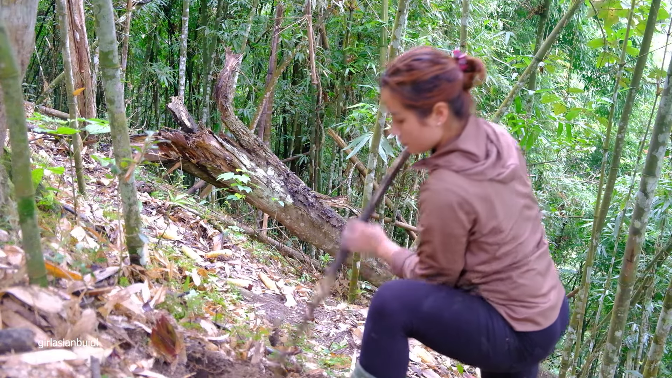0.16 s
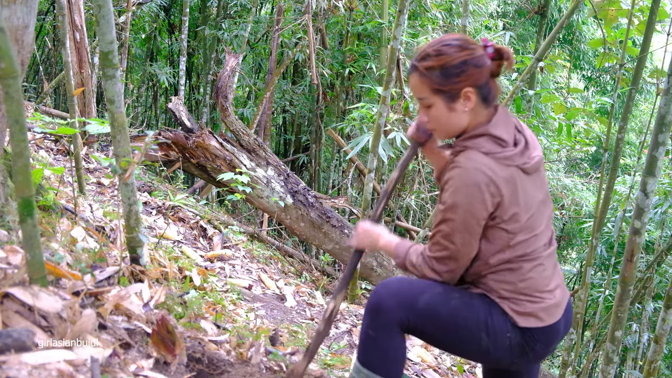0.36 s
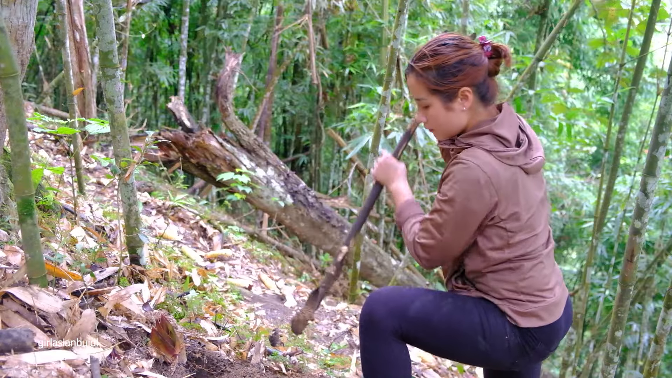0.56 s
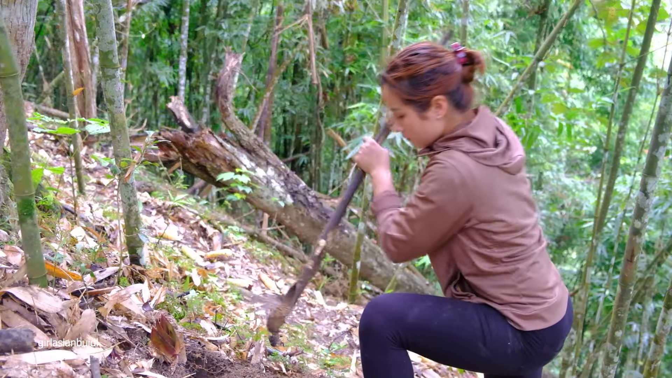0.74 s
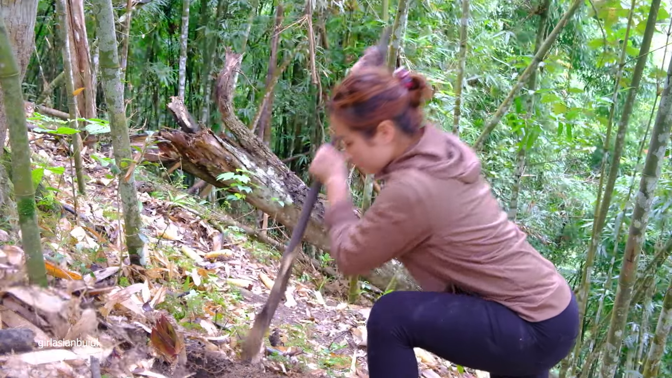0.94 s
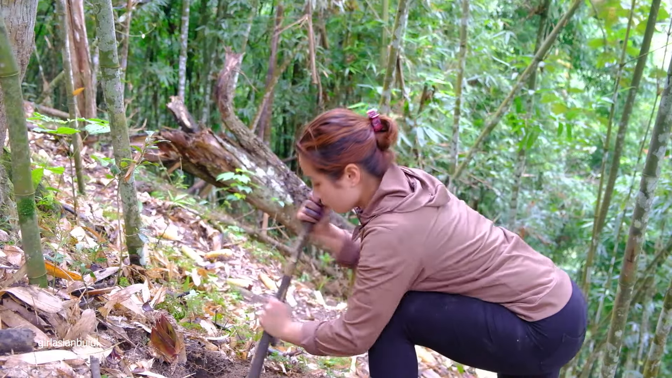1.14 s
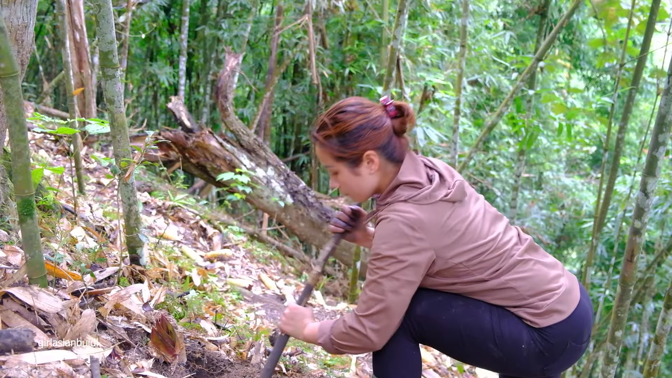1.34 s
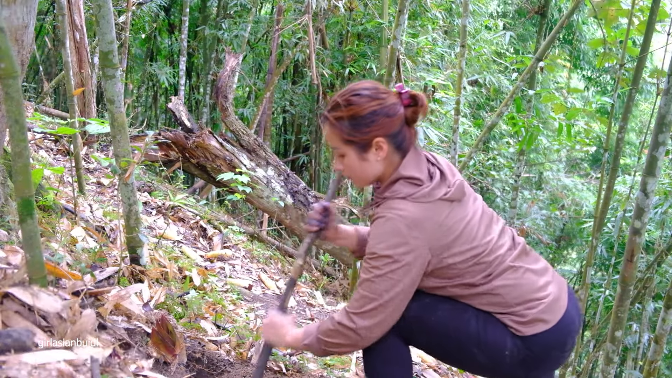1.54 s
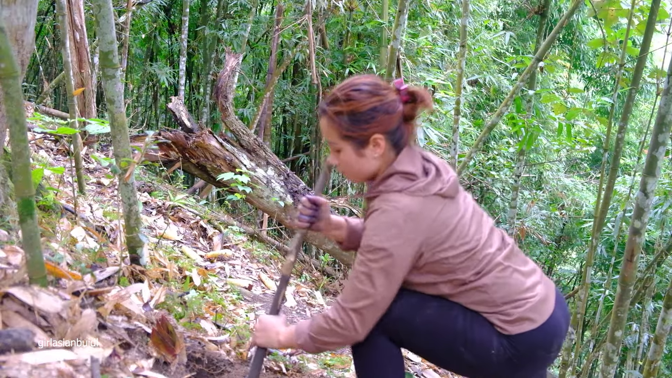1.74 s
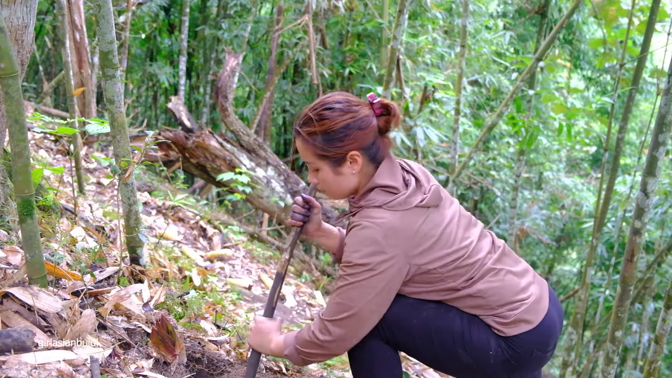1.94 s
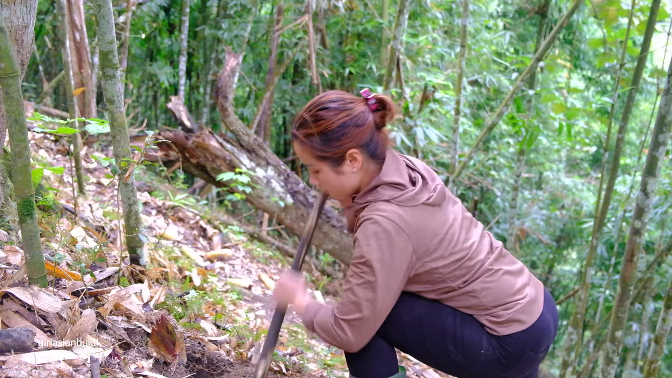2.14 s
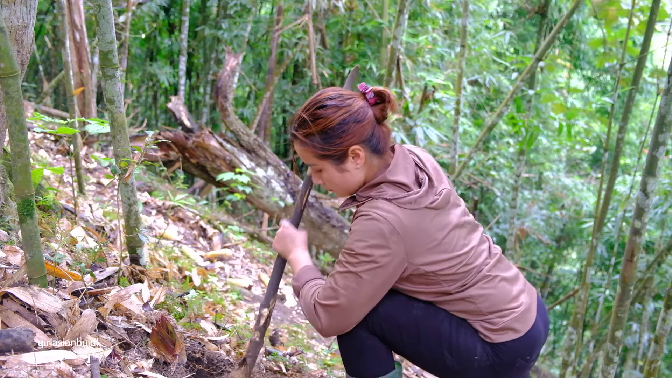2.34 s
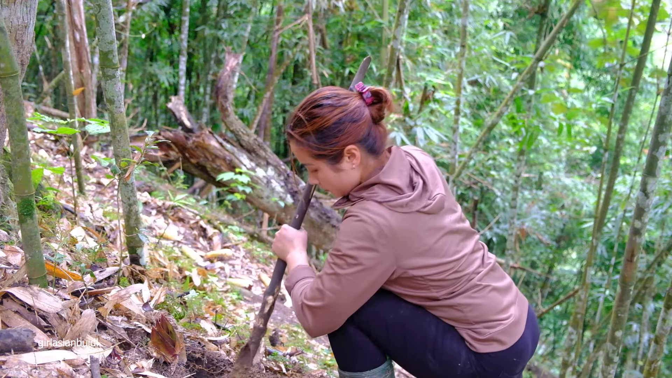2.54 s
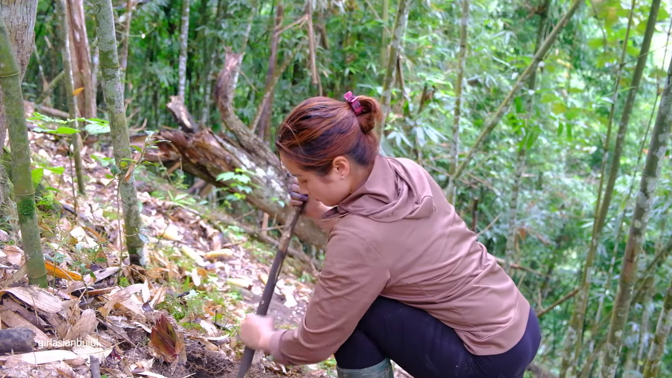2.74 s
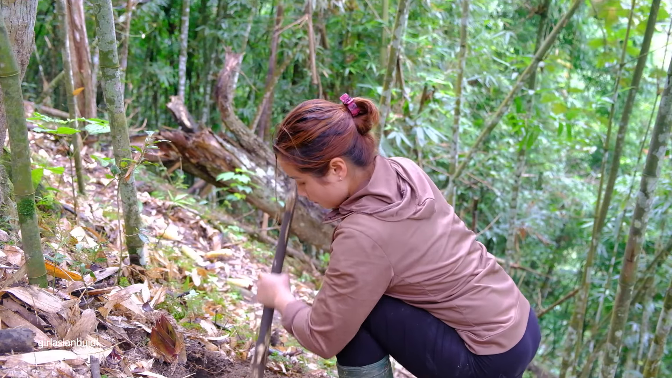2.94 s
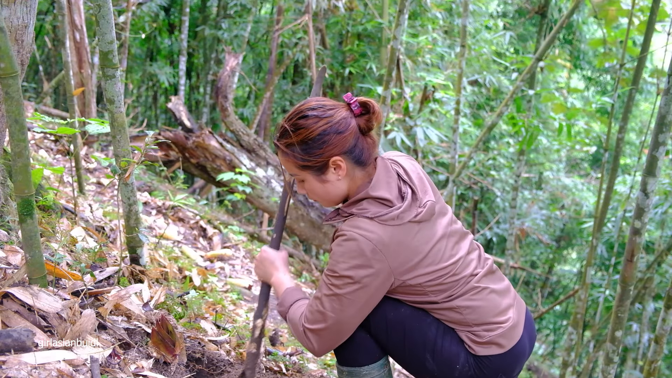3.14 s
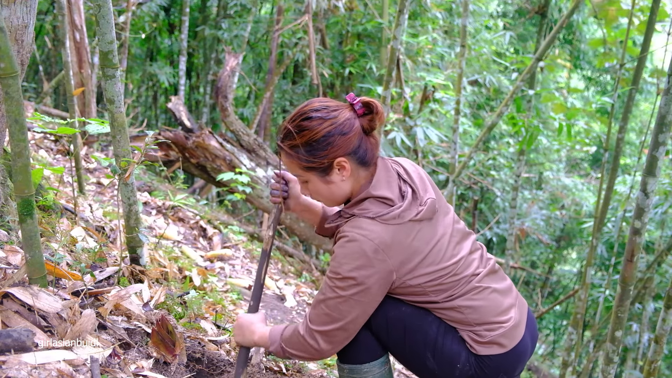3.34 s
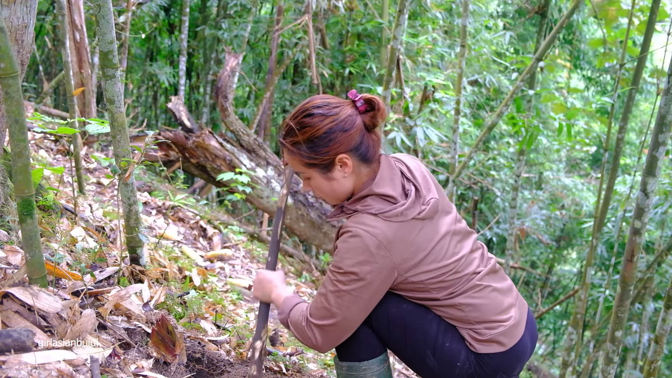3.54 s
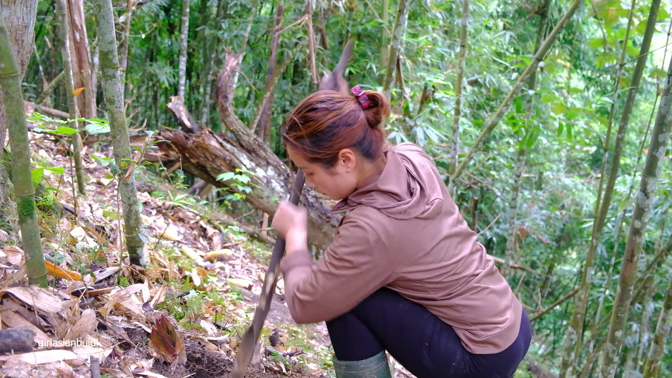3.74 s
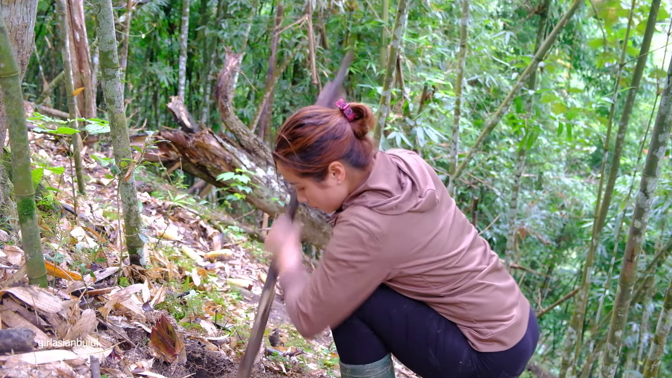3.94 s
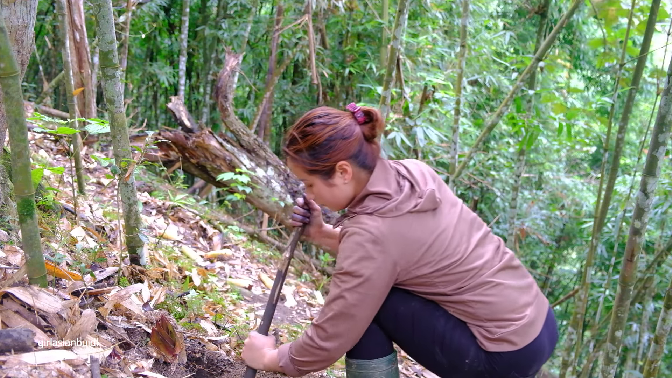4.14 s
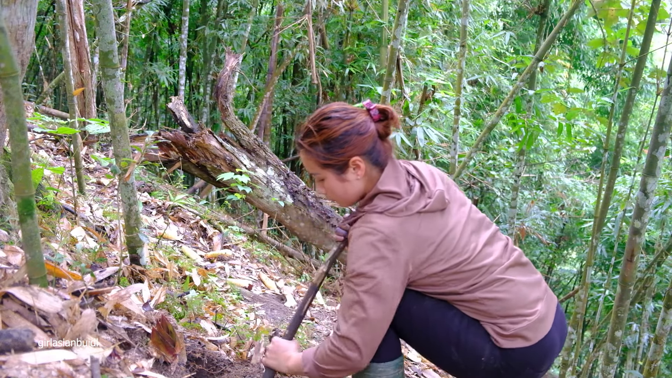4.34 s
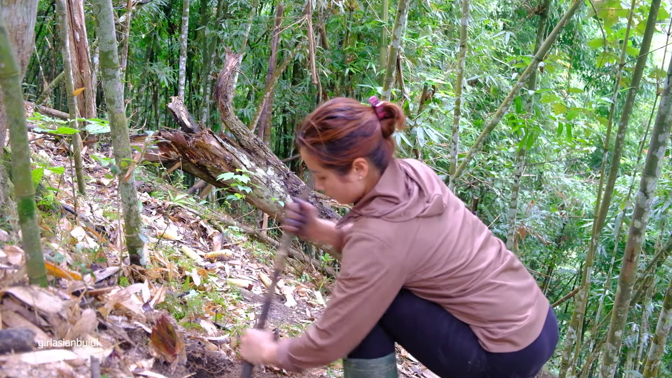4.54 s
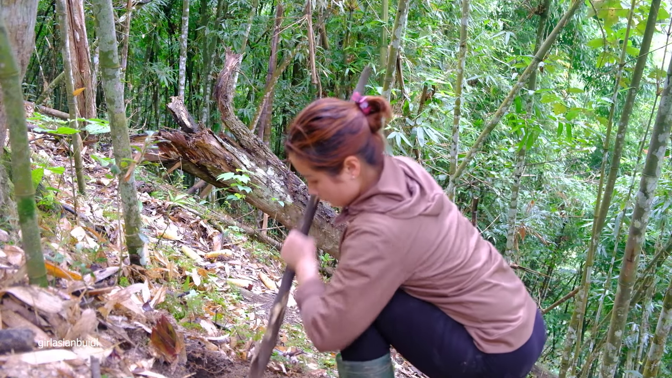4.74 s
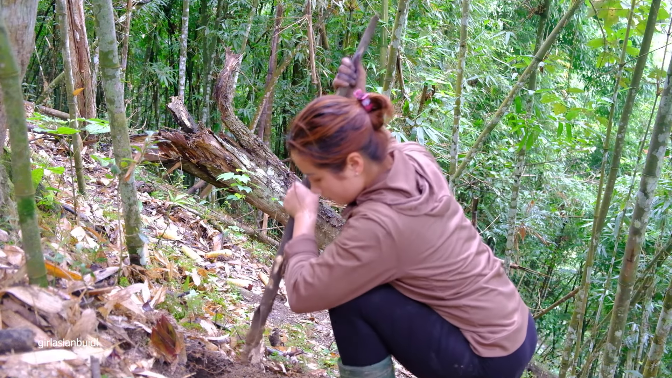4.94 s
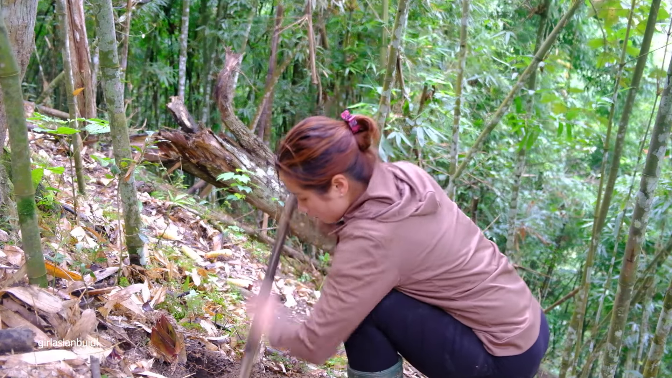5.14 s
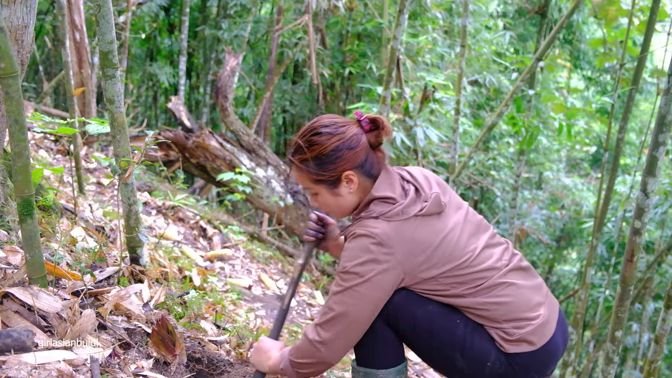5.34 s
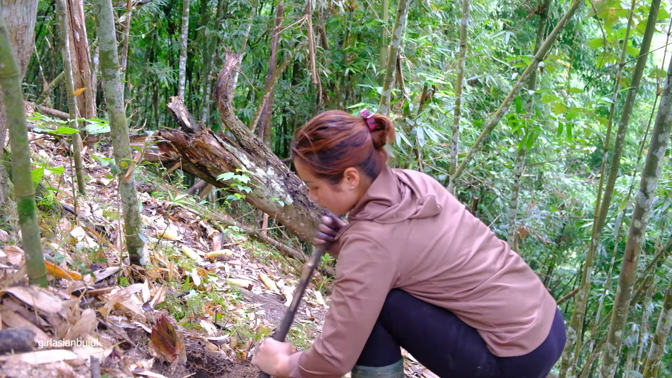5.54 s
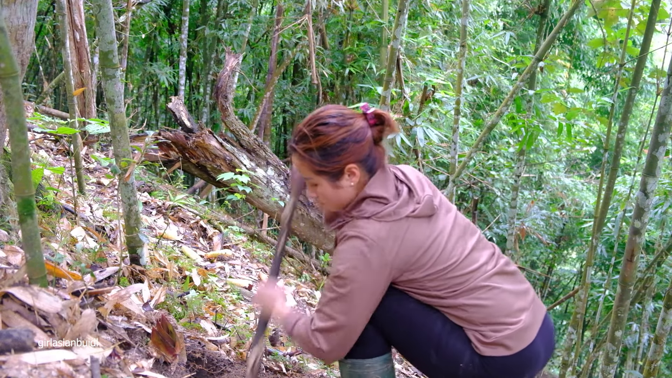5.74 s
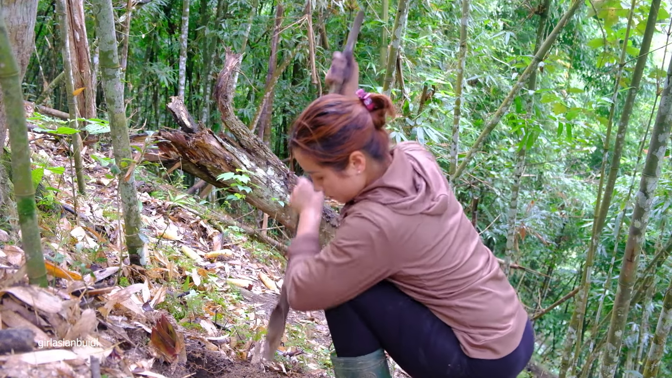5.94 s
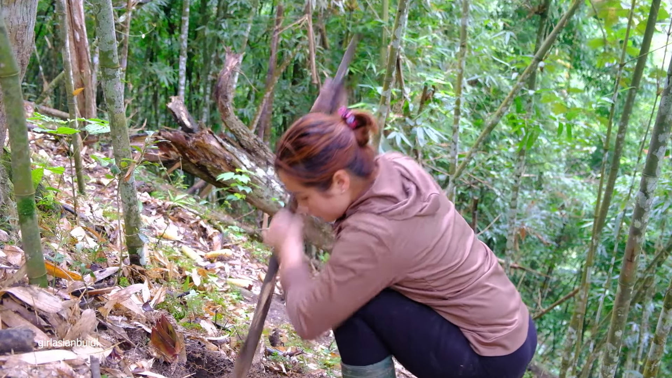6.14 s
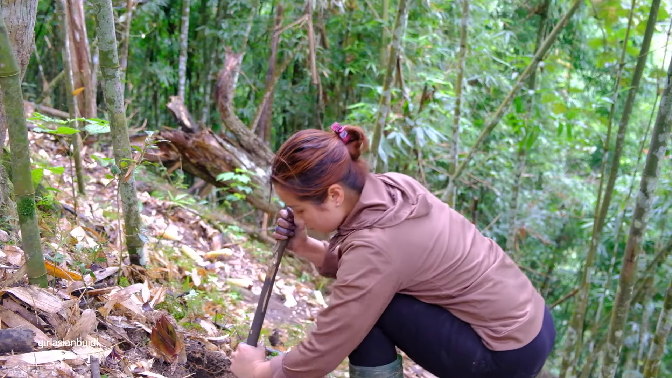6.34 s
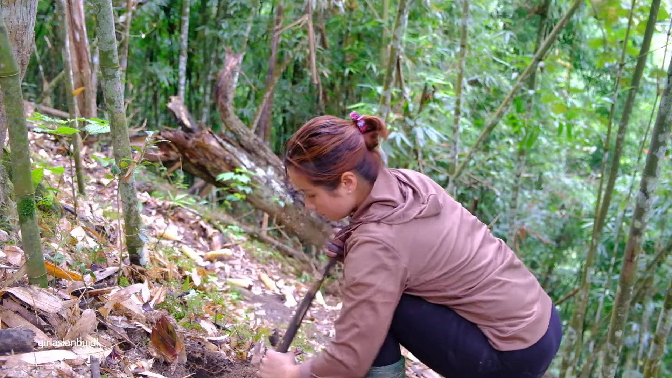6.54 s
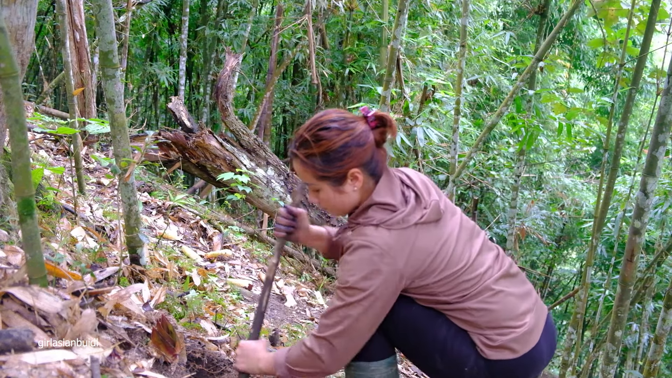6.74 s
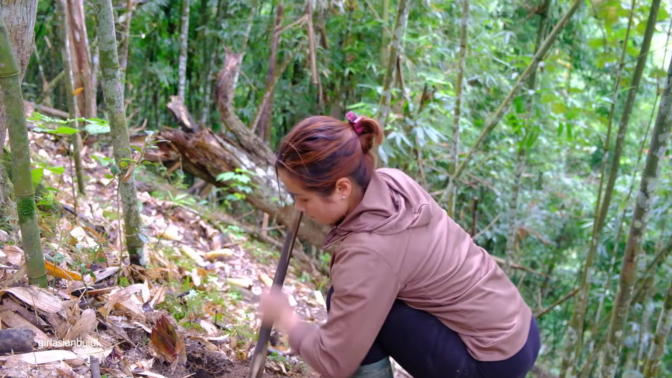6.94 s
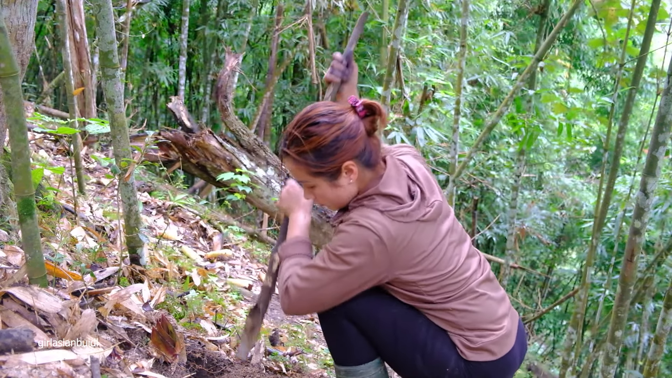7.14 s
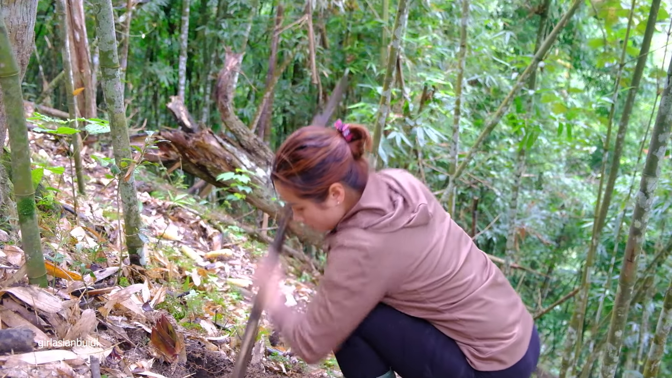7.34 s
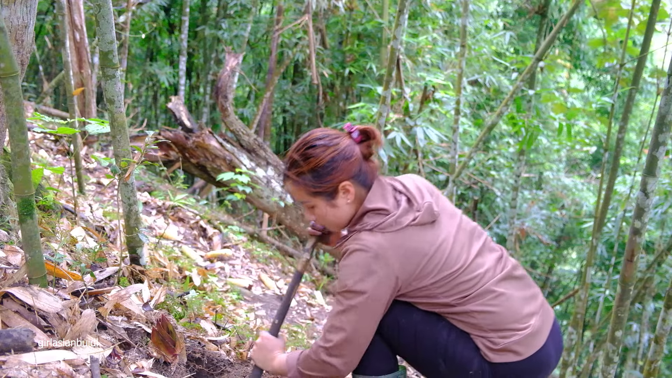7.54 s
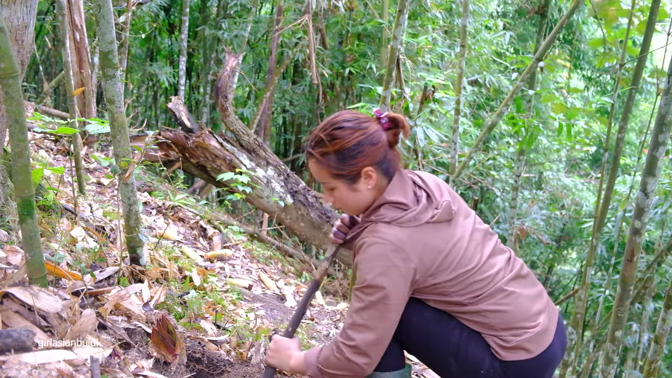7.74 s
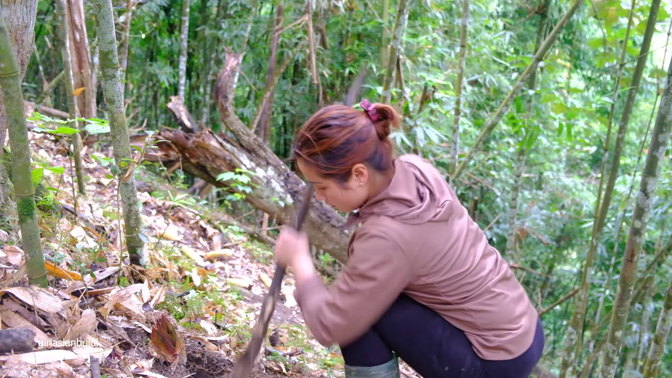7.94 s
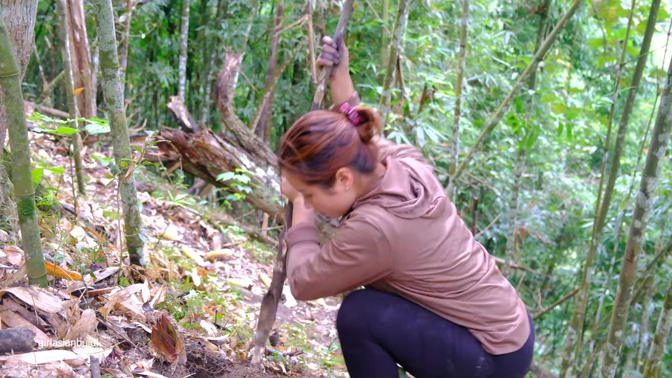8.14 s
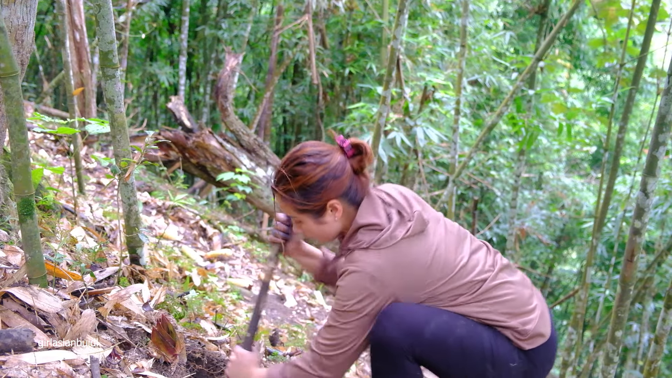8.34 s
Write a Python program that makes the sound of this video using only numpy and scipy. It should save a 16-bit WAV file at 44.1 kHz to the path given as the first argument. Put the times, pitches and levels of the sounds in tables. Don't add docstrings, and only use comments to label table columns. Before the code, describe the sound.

Ten irregular chops of a metal bar into earth, heard near and dry outdoors: root snaps, pebble ticks, short dull shaft knocks, soft ground thumps and falling crumbs. The hardest, sharpest crack comes near the end, followed by a boomier blow. Quiet scraping fills some gaps. Behind, a cicada rises and fades repeatedly, far insects hold a soft continuous hiss, a distant bird trills early, cricket pips are sparse, and a faint low engine recedes.

```python
import sys
import numpy as np
from scipy import signal
from scipy.fft import rfft, irfft, next_fast_len
from scipy.io import wavfile
from scipy.ndimage import uniform_filter1d, map_coordinates

SR = 44100
rng = np.random.default_rng(int(sys.argv[2]) if len(sys.argv) > 2 else 0)


def inscribe(sig):
    pcm = np.round(np.clip(np.atleast_2d(sig).T, -1, 1) * 32767)
    wavfile.write(sys.argv[1], SR, pcm.astype(np.int16))


def undo_db(level):
    steps = np.asarray(level, float) / 20
    return 10 ** steps


N = 369909
NOW_S = np.arange(N) / SR
PORTS = np.array([[.5], [-.5]])

# t/s, ground thump level/dB, low part level/dB, deep part level/dB, crumbs level/dB
BLOW_EVENTS = [
    (0.279, -45.5, 8.5, -1.5, -54.5),
    (1.126, -36, 0.1, -1.5, -48),
    (2.176, -50.5, 4, -13.5, -63),
    (2.788, -28, -4, -17, -49),
    (3.329, -38, -8, -19, -51.5),
    (4.072, -20.5, -8, -16, -46),
    (5.23, -25, -2, -11, -49.5),
    (6.289, -30.5, 0.1, -7, -48.5),
    (7.436, -25, 2.5, -16.5, -39),
    (8.365, -32.5, 7, -8, -44),
]
# t/s, crack level/dB, jolt level/dB, shaft ring f/Hz
ROOT_CONTACTS = [(1.1205, -26.5, -16, 403), (1.1231, -20, -16.5, 401), (1.137, -35, -23.5, 388),
                 (2.174, -28, -25.5, 393), (2.785, -25.5, -25, 245), (2.7905, -23, -7.5, 329),
                 (2.804, -45, -23, 294), (3.3164, -25, -27.5, 306), (3.3263, -26.5, -34, 500),
                 (3.3287, -33.5, -18, 392), (3.332, -27, -36.5, 410), (4.0667, -24, -23, 396),
                 (4.0692, -34.5, -16, 417), (4.0716, -25, -18.5, 412), (4.074, -20.5, -21, 421),
                 (4.079, -30.5, -23, 245.6), (5.2211, -23, -19, 356.4), (5.226, -19.5, -22.5, 602),
                 (5.2295, -25, -24, 394), (5.232, -28, -19, 408), (5.235, -25, -31, 374),
                 (6.2815, -42, -30, 457), (6.2827, -19.5, -30, 495), (6.2841, -33, -22.5, 301),
                 (6.2894, -29, -21, 323), (6.2929, -22.5, -30, 390), (6.2962, -26, -30, 590),
                 (7.4348, -10.5, -3, 355), (7.4388, -25, -12.5, 410), (7.447, -26.5, -19.5, 287),
                 (8.355, -26, -27, 381), (8.3602, -20, -26, 424), (8.365, -15.5, -26, 268),
                 (8.37, -18.5, -25, 357), (8.378, -38.5, -23, 389)]
# t/s, shaft t60/s, grit treble level/dB
BLOW_BITE = [(1.12, 0.03, -9.5), (2.17, 0.017, -22), (2.79, 0.016, -12), (3.32, 0.022, -19.5),
             (4.07, 0.027, -10), (5.23, 0.043, -19.5), (6.29, 0.051, -17), (7.44, 0.025, -5.5),
             (8.36, 0.047, -13)]
# t/s, peak level/dB, ring f/Hz
SHAFT_KNOCKS = [(.271, -52, 527), (.373, -50, 576), (.511, -48, 357), (.552, -50, 765), (.583, -42, 440),
                (0.631, -57, 339), (1.115, -30.5, 494), (1.187, -46, 365), (1.421, -50.5, 387),
                (2.686, -49.5, 536), (2.721, -55, 289), (2.924, -42, 410), (4.658, -44.5, 360),
                (5.242, -32.5, 344), (5.254, -42.5, 298), (5.748, -46, 325), (6.2837, -28.5, 826),
                (6.584, -45.5, 354), (6.93, -55, 359), (6.954, -49, 409), (7.4377, -18.5, 199),
                (7.658, -47.5, 392), (7.687, -47, 470), (7.711, -49, 279), (7.88, -42.5, 344)]
# t/s, peak level/dB, f/Hz
ROOTLET_SNAPS = [(0.2722, -37, 3800), (0.2759, -35, 3540), (1.1209, -33, 1670), (1.1222, -28, 5810),
                 (1.1222, -28, 3810), (1.1227, -30, 4880), (1.1234, -27, 1840), (1.1247, -21.5, 2930),
                 (1.1254, -29.5, 4950), (2.1752, -33, 2940), (2.1817, -42, 4950), (2.7837, -30, 3300),
                 (2.7899, -26, 1230), (2.7904, -21, 2030), (2.7919, -38, 5250), (2.7922, -24, 3230),
                 (2.7939, -30, 1700), (3.3105, -29, 2890), (3.3107, -31.5, 1370), (3.3107, -31, 2160),
                 (3.311, -27.5, 4370), (3.3239, -31, 2560), (3.3259, -27, 1230), (3.3274, -36.5, 3115),
                 (3.3319, -26.5, 1230), (4.067, -28, 2850), (4.0672, -25, 4430), (4.0672, -30, 1230),
                 (4.0727, -29, 3200), (4.0727, -25, 1360), (4.0744, -32.5, 4000), (4.0769, -33, 3940),
                 (4.0792, -24.5, 1290), (4.658, -45.5, 4050), (4.6884, -47, 2400), (5.2212, -24.5, 1160),
                 (5.2245, -34, 2860), (5.2257, -31.5, 5200), (5.2309, -20, 1176), (5.2314, -32, 2680),
                 (5.2344, -37, 3520), (5.2369, -35, 2530), (6.2825, -31.5, 4950), (6.2827, -32, 3160),
                 (6.2832, -24.5, 2130), (6.286, -31.5, 3270), (6.2872, -27, 2050), (6.2972, -40, 740),
                 (7.435, -11, 1280), (7.4352, -29.5, 5300), (7.4355, -15.5, 2470), (7.4355, -10.5, 3020),
                 (7.4387, -27.5, 5200), (7.439, -34, 1268), (7.4395, -17.5, 3440), (8.3595, -26, 2560),
                 (8.3632, -25, 1470), (8.3649, -20, 3500), (8.3662, -23, 1280), (8.3672, -29, 5740)]
# t/s, peak level/dB, f/Hz, t60/s
PEBBLE_CLOD_KNOCKS = [(.242, -49, 1450, 0.018), (.262, -40, 1255, 0.0158), (.273, -36.5, 1210, 0.0156),
                      (.361, -50.5, 1320, .016), (.379, -45, 1244, 0.017), (.556, -44, 906, 0.0157),
                      (.676, -48, 1750, 0.0157), (.697, -52, 1730, 0.0157), (.724, -60, 1150, 0.015),
                      (1.1077, -33, 4320, 0.0154), (2.7702, -36.5, 3260, 0.017), (3.3113, -27, 2600, 0.0039),
                      (3.3232, -11.5, 794, 0.0029), (3.3326, -30.5, 850, 0.0034), (4.602, -50.5, 660, 0.018),
                      (4.664, -41, 1020, 0.0156), (4.7, -44, 1260, 0.015), (5.2265, -25, 910, .014),
                      (4.0705, -24.5, 794, 0.019), (4.077, -26, 600, 0.0124), (6.2846, -13.5, 590, 0.0059),
                      (6.2931, -18, 600, 0.0089), (8.3708, -25, 1397, 0.0112), (8.3744, -13.5, 1510, 0.0081),
                      (.272, -51, 350, .04), (.586, -47, 850, .03), (.646, -52, 565, .04), (.953, -54, 583, 0.051),
              (1.133, -37, 1410, .015), (2.139, -52, 350, .05), (2.771, -48, 1400, .015),
              (2.92, -47, 1300, .02), (2.969, -51, 350, .05), (3.353, -47, 1400, .02),
              (5.269, -51, 560, .04), (6.334, -47, 1300, .02), (6.349, -50, 850, .04),
              (6.35, -53, 350, 0.045), (6.645, -56.5, 570, .12), (6.969, -51, 850, .03),
              (7.17, -55, 567, .05), (7.317, -51, 846, 0.041), (7.513, -54, 350, .05),
              (7.687, -50, 320, 0.072), (1.1225, -32, 560, .03), (1.124, -33, 806, 0.032),
              (4.647, -48, 4000, .012), (4.671, -49, 3500, .012), (6.287, -31, 950, .03),
              (7.4355, -20.5, 574, 0.028), (7.437, -25, 1294, .03), (8.368, -28, 1525, .035),
              (2.7698, -40, 5200, .008), (3.3115, -29, 3600, .004)]
# t/s, peak level/dB, treble level/dB, t60/s
LITTER_BRUSHES = [(1.1077, -26.5, -17, 0.04), (1.1457, -39.5, -14.5, 0.0365), (1.4164, -42.5, -15, 0.04),
                  (2.77, -36.5, 0, 0.0222), (3.3111, -25, -9, 0.012), (4.0628, -25, -19.5, 0.032)]
# t/s, rms level/dB, length/s, treble level/dB
BLADE_SCUFFS = [(0.254, -45.5, 0.034, -5), (0.361, -52.5, 0.0446, -4), (1.573, -66, 0.103, 3.5),
                (2.145, -46.5, 0.039, -18.5), (2.907, -55.5, 0.059, -5), (4.641, -50, 0.049, -11),
                (4.687, -57, 0.0135, -12.5), (5.728, -50, 0.047, -13), (6.277, -53, 0.0067, -29),
                (6.554, -60, 0.0135, -3), (6.573, -54, 0.019, 0), (7.432, -57, 0.0033, -31.5),
                (8.349, -35, 0.0204, -20.5), (6.941, -52, 0.035, -15.5), (7.856, -52.5, 0.048, -8)]
# t/s, peak level/dB, left-right level/dB
LEAF_TICKS = [(1.028, -65.5, -1.5), (1.3472, -59.5, 0.5), (1.394, -58, 1.0), (1.4194, -62, 1),
              (1.7389, -62.5, -2), (2.3594, -50.5, -1.5), (2.9894, -57.5, -1.0), (4.572, -60.5, 2),
              (4.8672, -57.5, 0.0), (7.4887, -50.5, -6)]
# f/Hz, width/Hz, level/dB
BLADE_MODES = [(500, 130, 2.5), (843, 120, 3), (1034, 81, 2), (1262, 94, 1.5), (1547, 140, 4),
               (1980, 530, -1), (3170, 658, -0.5), (4400, 2120, -7)]
# f/Hz, level/dB, t60/s
GROUND_MODES = [(186.5, 2.5, 0.051), (147, 5.5, 0.079), (102.7, -4, 0.15), (65.6, 7, 0.15),
                (43.7, -8, 0.22)]
# f/Hz, level/dB
CRUMB_SPECTRUM = [(100, -48), (300, 3), (1000, 2.5), (3000, 0), (6000, 3), (10000, -6), (16000, -20)]
# strongest push t/s, level/dB, swell/s, fade/s
DRAG_PUSHES = [(.52, -56, 0.049, 0.11), (.59, -53.5, 0.156, 0.19), (2.73, -60.5, 0.26, 0.029),
               (2.9, -58.5, 0.051, 0.53), (3.42, -64, 0.029, 0.56), (6.96, -56.5, 0.14, 0.041),
               (7.2, -60, 0.15, 0.066), (7.696, -58, 0.043, 0.13)]
# f/Hz, level/dB per Hz
SOIL_SPECTRUM = [(88, -45), (150, -7), (246, -3.5), (290, 1), (616, -5.5), (761, -9), (2500, -6),
                 (3250, -43), (5500, -120)]
# t from its start/s, body resonance f/Hz, level/dB
BUZZ_SHAPE = [(0, 3360, -66.5), (.08, 3620, -61.5), (.17, 3670, -51), (.32, 4090, -48), (.44, 4660, -45.5),
              (.54, 4970, -44.5), (.63, 5040, -45.5), (.73, 4900, -52.5), (.87, 4780, -69)]
# start t/s, level/dB, time stretch (ratio), pitch lead/s
BUZZ_EVENTS = [(.07, 0., 0.983, 0.0019), (1.68, -0.5, 0.999, 0.0124), (3.279, -0.5, 1.053, -0.016),
               (4.93, 0, 1.049, 0.014), (6.549, 0, 0.95, -0.012), (8.13, -1.5, 1.2, 0.0027)]
# f/Hz, half width/Hz, level/dB
PERCH_MODES = [(3700, 60, 7), (3950, 60, 8.5), (4245, 55, 10.5), (4545, 60, 10.5), (4870, 60, 9),
               (5265, 60, 10), (5630, 70, 8)]
# f/Hz, t60/s
FOREST_DECAY = [(100, 0.31), (1000, 0.1), (4000, 0.47), (12000, 0.21)]
# f/Hz, level/dB per Hz
CHORUS_SPECTRUM = [(120, -42.5), (200, -11), (517, -11), (566, -10.5), (656, -8), (718, -10.5), (787, -10),
                   (1270, -10), (1600, -13), (1900, -10), (2300, -0.5), (3040, 2), (3720, -8), (4980, -5),
                   (8000, -26), (15700, -38.5)]
# t/s, level/dB
SHRILL_LEVEL = [(0, -73), (.8, -71), (1.2, -67.5), (1.75, -67), (2.4, -73), (2.8, -85), (3.5, -73),
                (8.39, -87)]
# f/Hz, level/dB
SHRILL_SPECTRUM = [(4500, -61.5), (5600, -2), (6600, 0.0), (7300, -5), (8000, -63)]
# t/s, level/dB, f/Hz
CRICKET_PIPS = [(.36, -59.5, 9340), (4.256, -67, 9374), (6.452, -62, 9340), (7.609, -58.5, 9370)]
# t/s, level/dB
AIR_LEVEL = [(0, -77), (.47, -71.5), (1.1, -74.5), (3.6, -74.5), (4.06, -72), (4.8, -76), (5.35, -71),
             (5.7, -73.5), (6.94, -72.5), (8.39, -74.5)]
# f/Hz, level/dB per Hz
AIR_SPECTRUM = [(12, -37.5), (20, -7), (38, -5.5), (54, -0.5), (70, -5), (91, -6), (134, -4), (226, -19),
                (300, -10), (390, -51.5), (660, -120)]
# t/s, firing rate f/Hz, distance level/dB
ENGINE_COURSE = [(0, 37.5, -1.5), (1.2, 35.95, -2), (2.5, 34.34, -1), (4, 33.62, -0.56), (5, 32.34, 1),
                 (6.2, 31.95, 1.5), (7.3, 33.03, -5), (8.39, 33.54, -13)]
# f/Hz, level/dB
EXHAUST_SPECTRUM = [(95, -71.5), (112, -65), (128, -68), (143, -62.5), (152, -79), (165, -70.5), (182, -66),
                    (200, -84.5)]
# f/Hz, left-right likeness (-1..1)
PORT_LIKENESS = [(60, -0.1), (150, 0.344), (380, 0.53), (950, 0.526), (2380, 0.49), (5980, -0.354),
                 (15000, 0.386)]
# f/Hz, level/dB
HISS_SPECTRUM = [(6000, -28.5), (11000, -6.0), (14500, -5), (16000, -9.0)]


def unit(x):
    return x / np.sqrt(np.mean(x ** 2) + 1e-20)


def along(points, hz):
    f, v = np.transpose(points)
    return np.interp(np.log(hz + 1), np.log(f + 1), v)


def curves(rows):
    s, *cols = np.transpose(rows)
    return [np.interp(NOW_S, s, c) for c in cols]


def wobble(rate_hz):
    knots = rng.standard_normal(int(N * rate_hz / SR) + 4)
    return map_coordinates(knots, [np.arange(N) * rate_hz / SR])


def filtered(x, response):
    m = next_fast_len(N + SR // 2)
    return irfft(rfft(x, m) * response(np.fft.rfftfreq(m, 1 / SR)), m)[..., :N]


def add(track, s, sound):
    part = track[..., round(s * SR):][..., :sound.shape[-1]]
    part += sound[..., :part.shape[-1]]


def ring(hz, t60_s, rise_s, t):
    return np.sin(2 * np.pi * hz * t) * undo_db(-60 * t / t60_s) * (1 - np.exp(-t / rise_s))


def grit(density_hz, spread_db):
    chance, sign, size = rng.random((3, 2, N))
    grains = (chance < density_hz / SR) * np.sign(sign - .5)
    return unit(grains * undo_db(-spread_db * np.log(size + 0.0092)))


def rush(spectrum, patchy_db):
    z = signal.stft(rng.standard_normal((2, N)), nperseg=512)[2]
    field = uniform_filter1d(rng.standard_normal(z.shape[1:]), 6, 0)
    field = uniform_filter1d(field, 14, 1)
    pair = signal.istft(z * undo_db(patchy_db * unit(field)), nperseg=512)[1][:, :N]

    def mid_side(hz):
        turn = np.arccos(np.clip(along(PORT_LIKENESS, hz), -1, 1)) / 2
        return undo_db(along(spectrum, hz)) * [np.cos(turn), np.sin(turn)]

    mid, side = filtered(pair, mid_side)
    return unit(np.array([mid + side, mid - side]))


def placed(x, lag_s, pan_db):
    return filtered(x, lambda hz: undo_db(PORTS * pan_db) * np.exp(-2j * np.pi * hz * PORTS * lag_s))


def forest(x):
    hz, t, z = signal.stft(rng.standard_normal((2, SR // 2)), SR, nperseg=256)
    decay = undo_db(-60 * t / along(FOREST_DECAY, hz)[:, None])
    tail = signal.istft(z * decay, SR, nperseg=256)[1]
    return signal.fftconvolve(x[None], tail / np.linalg.norm(tail[0]), axes=1)[:, :N]


def bite(s):
    return min(BLOW_BITE, key=lambda row: abs(row[0] - s))[1:]


def shaft():
    jolt_lag_s, knock_t60_s, jolt_rise_s, snap_rise_s = 0.00037, 0.048, 0.00095, 0.00063
    snap_t60_s, snap_cycles = 0.0096, 7.9
    track, t = np.zeros(N), np.arange(SR // 4) / SR
    jolts = [(s, db, hz, knock_t60_s) for s, db, hz in SHAFT_KNOCKS]
    jolts += [(s + jolt_lag_s, db, hz, bite(s)[0]) for s, _, db, hz in ROOT_CONTACTS]
    for s, db, hz, t60_s in jolts:
        add(track, s, -undo_db(db + 0.5) * ring(hz, t60_s, jolt_rise_s, t))
    snaps = [(s, db, hz, snap_t60_s + snap_cycles / hz) for s, db, hz in ROOTLET_SNAPS]
    for s, db, hz, t60_s in snaps + PEBBLE_CLOD_KNOCKS:
        add(track, s, -undo_db(db + 2.0) * ring(hz, t60_s, snap_rise_s, t))
    return signal.sosfilt(signal.butter(2, 120, "high", fs=SR, output="sos"), track)


def ground():
    track, t = np.zeros(N), np.arange(SR // 4) / SR
    for s, db, low_db, deep_db, _ in BLOW_EVENTS:
        for hz, mode_db, t60_s in GROUND_MODES:
            hz = hz * np.exp(rng.normal(0, 0.063))
            level_db = db - 3.0 + mode_db + rng.normal(0, 1.32)
            level_db += deep_db * (hz < 80) + low_db * (80 <= hz < 122)
            delay_s = rng.uniform(0.16, 0.62) / hz
            add(track, s + delay_s, undo_db(level_db) * ring(hz, t60_s, 0.29 / hz, t))
    return track


def blade_modes(f):
    return sum((-1) ** k * undo_db(db) * 1j * f * w / (c * c - f * f + 1j * f * w)
               for k, (c, w, db) in enumerate(BLADE_MODES))


def blade():
    crack_t60_s, crack_rise_s, leaf_t60_s = 0.036, 0.000341, 0.0123
    sharp, treble, t = np.zeros(N), np.zeros((2, N)), np.arange(SR // 4) / SR
    cracks = LITTER_BRUSHES + [(s, db, bite(s)[1], crack_t60_s) for s, db, *_ in ROOT_CONTACTS]
    contacts = []
    for s, db, treble_db, t60_s in cracks:
        shape = undo_db(-60 * t / t60_s) * (1 - np.exp(-t / crack_rise_s))
        contacts.append((s, db, treble_db, shape))
    for s, db, length_s, treble_db in BLADE_SCUFFS:
        shape = np.sin(np.pi * np.clip(t / length_s, 0, 1))
        contacts.append((s, db + 7.5, treble_db - 3.0, shape))
    for s, db, treble_db, shape in contacts:
        noise = rng.standard_normal((4, len(t)))
        burst = shape * noise[:3] * undo_db(2.9 * noise[3])
        add(sharp, s, undo_db(db + 0.5) * burst[0])
        add(treble, s, undo_db(db + treble_db - 13.5) * (burst[0] * 0.51 + 1.4 * burst[1:]))
    for s, db, pan_db in LEAF_TICKS:
        level = undo_db(db + 1.5 + PORTS * pan_db - 60 * t / leaf_t60_s)
        add(treble, s, level * rng.standard_normal((2, len(t))))
    band = signal.butter(2, [5000, 17500], "band", fs=SR, output="sos")
    return filtered(sharp, blade_modes), signal.sosfilt(band, treble)


def crumbs():
    shower, t = np.zeros(N), np.arange(SR // 2) / SR
    for *_, db in []:
        pass
    for s, *_, db in BLOW_EVENTS:
        add(shower, s, undo_db(db + 6.5 - 60 * t / 0.23) * (1 - np.exp(-t / 0.00081)))
    patter = filtered(grit(9000., 4.0), lambda hz: undo_db(along(CRUMB_SPECTRUM, hz)))
    side = filtered(patter[1], lambda hz: hz ** 2 / (hz ** 2 + 2100.0 ** 2))
    return shower * unit(patter[0] + [side, -side])


def loose_soil():
    drop_db = 19.5
    lumps, t = np.zeros(N), np.arange(SR // 2) / SR
    for s, *_, db in BLOW_EVENTS:
        add(lumps, s, undo_db(db - 60 * t / 0.25) * (1 - np.exp(-t / 0.01)))
    push = sum(undo_db(db - drop_db * np.maximum((s - NOW_S) / swell_s, (NOW_S - s) / fade_s))
               for s, db, swell_s, fade_s in DRAG_PUSHES)
    grind = filtered(grit(2500., 2.5)[0], lambda hz: undo_db(along(SOIL_SPECTRUM, hz)))
    return (push + lumps) * unit(grind)


def spells(tables, fade_s):
    gate = sum(np.clip(np.minimum(NOW_S - rows[0][0], rows[-1][0] - NOW_S) / fade_s, 0, 1)
               for rows in tables)
    return [gate] + curves([row for rows in tables for row in rows])


def clicks(lowest_hz, highest_hz, rate_hz, jitter, length_s, size_db):
    count, size = int(N / SR * rate_hz * 1.1), int(length_s * SR) + 1
    draw = rng.random((count, 4))
    start = (np.arange(count) + jitter * draw[:, 0]) / rate_hz * SR
    start = np.clip(start, 0, N - 1).astype(int)
    t = np.arange(size) / SR
    span_hz = (highest_hz - lowest_hz)[start]
    pitch_hz = lowest_hz[start] + span_hz * (draw[:, 1] + draw[:, 2]) / 2
    wave = undo_db(size_db * draw[:, 3:]) * np.sin(2 * np.pi * pitch_hz[:, None] * t)
    wave = wave * np.sin(np.pi * np.clip(t / length_s, 0, 1)) ** 2
    place = start[:, None] + np.arange(size)
    return unit(np.bincount(place.ravel(), wave.ravel(), N)[:N])


def perch(f):
    return 0.46 * undo_db(sum(db / (1 + ((f - c) / w) ** 2) for c, w, db in PERCH_MODES))


def wings(f):
    return .75 + .3 / (1 + ((f - 9400) / 350) ** 2) + .7 / (1 + ((f - 14100) / 300) ** 2)


def cicada():
    pitch_s, pitch_hz, _ = np.transpose(BUZZ_SHAPE)
    tables = [[(start_s + stretch * s, np.interp(s + early_s, pitch_s, pitch_hz), db + gain_db)
               for s, _, db in BUZZ_SHAPE]
              for start_s, gain_db, stretch, early_s in BUZZ_EVENTS]
    gate, hz, db = spells(tables, fade_s=0.023)
    level = gate * undo_db(db + 0.86 * wobble(60))
    body = clicks(hz - 430, hz + 300, 325, .7, 0.0034, 4.5)
    body = body + undo_db(-8) * clicks(hz + 250, hz + 850, 325, .6, 0.0023, 7)
    edge_hz = 12060 + 1.08 * hz + 120 * db
    second_db = np.minimum(-14, -63.5 - db)
    second = np.array([clicks(4300 + 0.35 * hz, 1.055 * edge_hz, 4400, .9, 0.00322, 1.0)
                       for port in "LR"])
    third = np.array([clicks(7000 + .5 * edge_hz, 17000 + 0 * hz, 2000, .9, .005, 3)
                      for port in "LR"])
    upper = undo_db(second_db + 4.0 - 3.6 * PORTS) * second + undo_db(-24 - 5.6 * PORTS) * third
    return filtered(level * body, perch), filtered(level * upper, wings)


def far_insects():
    sway_db = 0.48 * wobble(1.566) + 0.1006 * wobble(3.3) + 0.84 * wobble(40)
    return undo_db(-50.0 + sway_db) * rush(CHORUS_SPECTRUM, patchy_db=0.74)


def shrill_insect():
    level_db, = curves(SHRILL_LEVEL)
    flutter_db = 0.72 * wobble(26) + 2.8 * wobble(90)
    return undo_db(level_db - 1.5 + flutter_db) * rush(SHRILL_SPECTRUM, patchy_db=1.8)


def cricket():
    track, t = np.zeros(N), np.arange(SR // 45) / SR
    shape = np.abs(np.sin(np.pi * t / t[-1])) ** 0.23
    for s, db, hz in CRICKET_PIPS:
        add(track, s, undo_db(db) * np.sin(2 * np.pi * hz * (t + 0.36 * t * t)) * shape)
    return track


def bird_trill():
    start_s, every_s, note_s = 1.008, .134, .075
    top_hz, fall_hz, gain_db = 7150, 1900, 3
    song, t = np.zeros(N), np.arange(int(note_s * SR)) / SR
    level_db, = curves(SHRILL_LEVEL)
    for k, (late, flat, size) in enumerate(rng.standard_normal((11, 3))):
        s = start_s + k * every_s + .004 * late
        hz = (1 + 0.0085 * flat) * (top_hz - fall_hz * (t / note_s) ** 1.7)
        note = np.sin(2 * np.pi * np.cumsum(hz) / SR) * np.sin(np.pi * t / note_s) ** .6
        add(song, s, undo_db(level_db[round(s * SR)] + gain_db + 1.5 * size) * note)
    return .6 * song + 0.65 * forest(song)


def air():
    level_db, = curves(AIR_LEVEL)
    return undo_db(level_db + 8.5 + 1.25 * wobble(3.576)) * rush(AIR_SPECTRUM, patchy_db=0.5)


def engine():
    firing_hz, level_db = curves(ENGINE_COURSE)
    turn = 2 * np.pi * np.cumsum(firing_hz) / SR
    hum = undo_db(-76.5 + 3.4 * wobble(1.63)) * np.sin(2 * np.pi * 49 * NOW_S + .7 * wobble(2.107))
    for k in range(3, 7):
        line_db = level_db - 1.2 + along(EXHAUST_SPECTRUM, k * firing_hz) + 0.59 * wobble(5.3)
        hum += undo_db(line_db) * np.sin(k * turn + .5 * wobble(3.6))
    return hum


def scene():
    low = shaft() + ground()
    struck, bright = blade()
    near = placed(low, -0.000034, -0.49) + placed(struck, -0.000031, -0.53) + bright
    near = near + crumbs() + loose_soil()
    scatter = undo_db(-27.5) * forest(low) + undo_db(-16.5) * forest(struck)
    body, overtones = cicada()
    song = placed(body, 0.000324, -0.2) + undo_db(-1.8) * forest(body) + overtones
    behind = far_insects() + shrill_insect() + cricket() + bird_trill() + air() + engine()
    return near + scatter + song + placed(behind, -0.00003, 0)


def band_limit(x):
    return signal.sosfilt(signal.butter(12, 15810, fs=SR, output="sos"), x)


def record(dry):
    low_cut_hz, top_hz = 29, 15800
    hiss = undo_db(-81.5) * rush(HISS_SPECTRUM, patchy_db=2.0)

    def band(hz):
        return (hz < top_hz) * hz ** 2 / (hz ** 2 - 1.4j * hz * low_cut_hz - low_cut_hz ** 2)

    return band_limit(filtered(dry + hiss, band))


dry = scene()
out = record(dry)
inscribe(out)
```